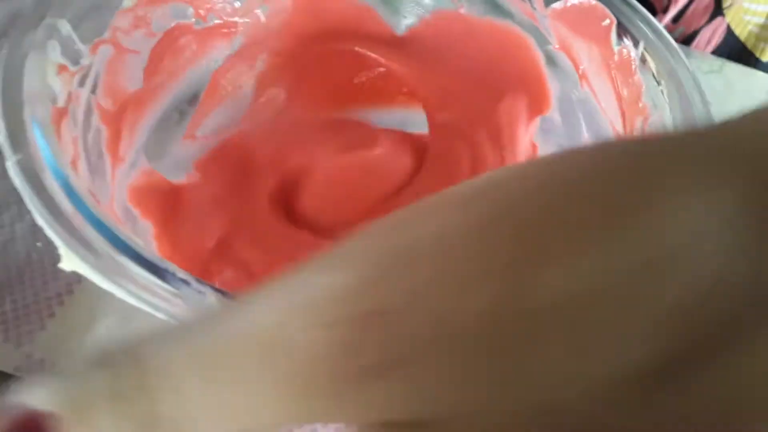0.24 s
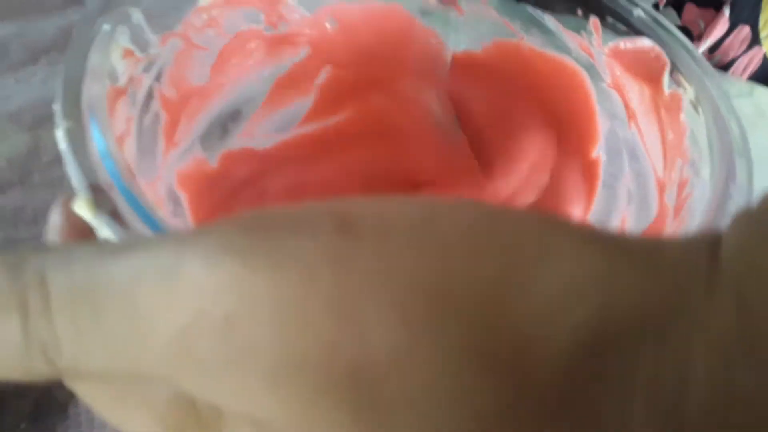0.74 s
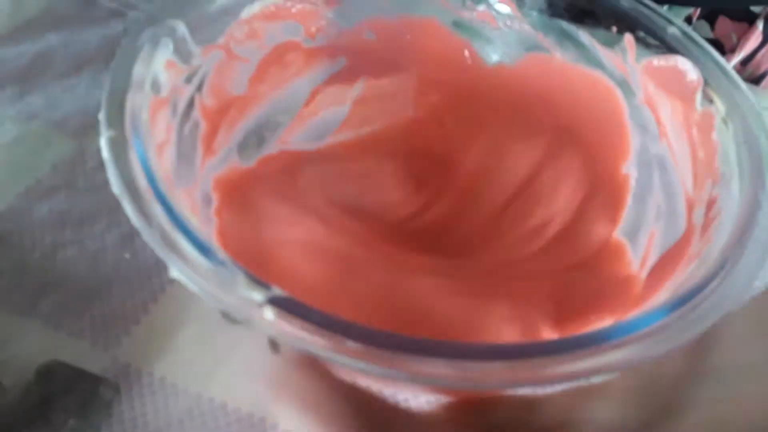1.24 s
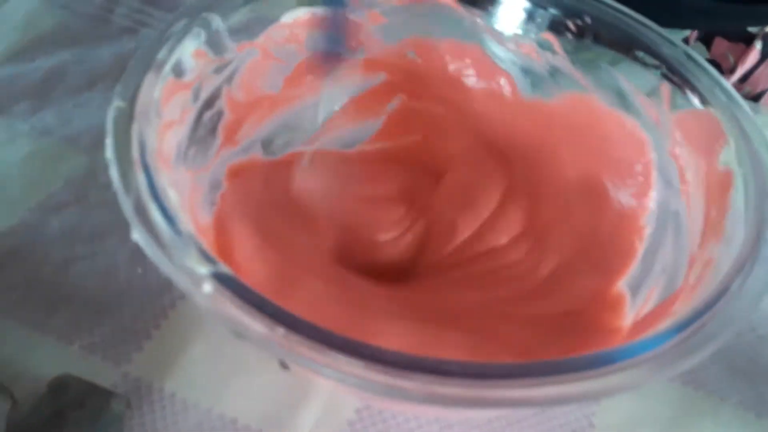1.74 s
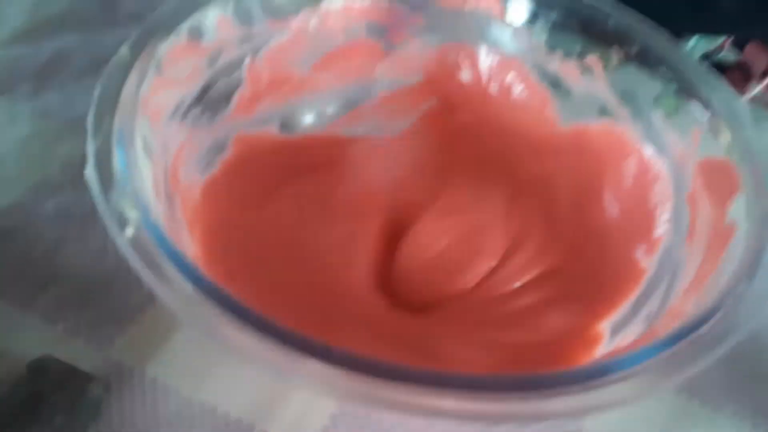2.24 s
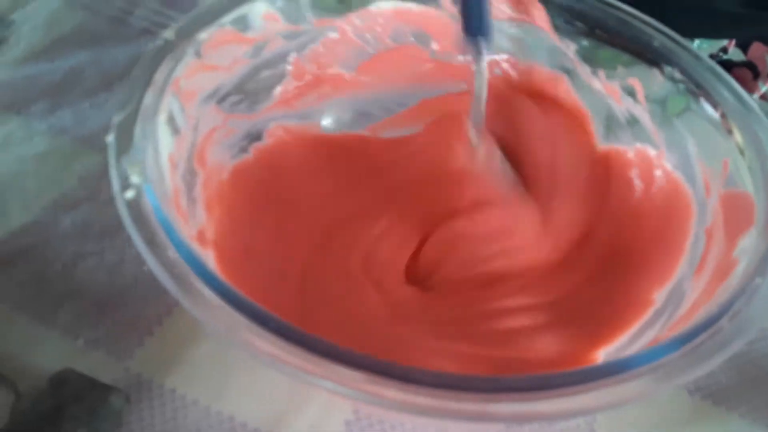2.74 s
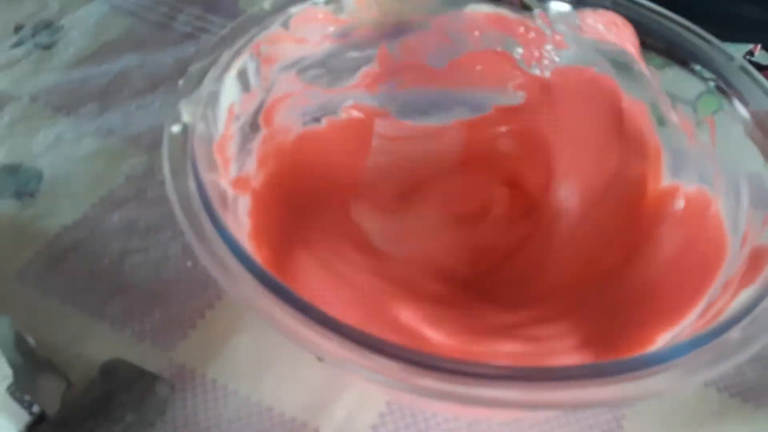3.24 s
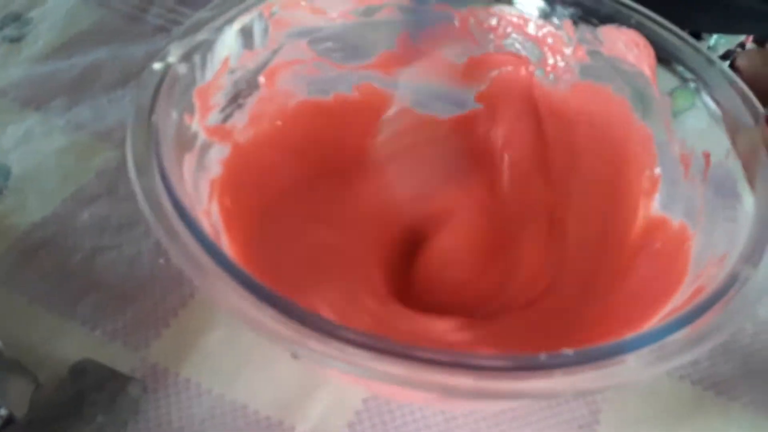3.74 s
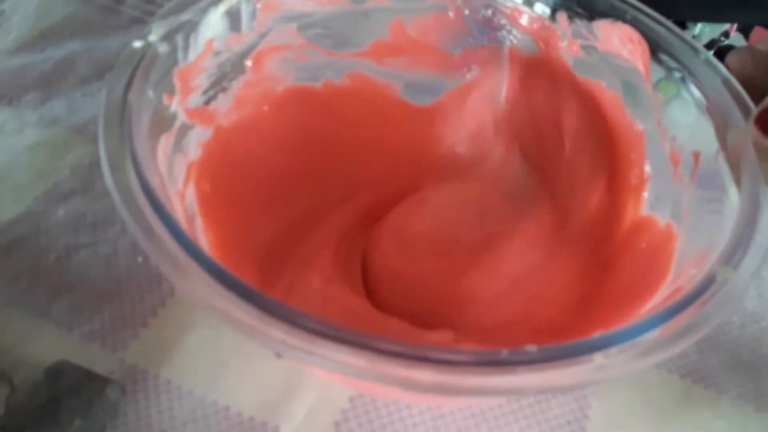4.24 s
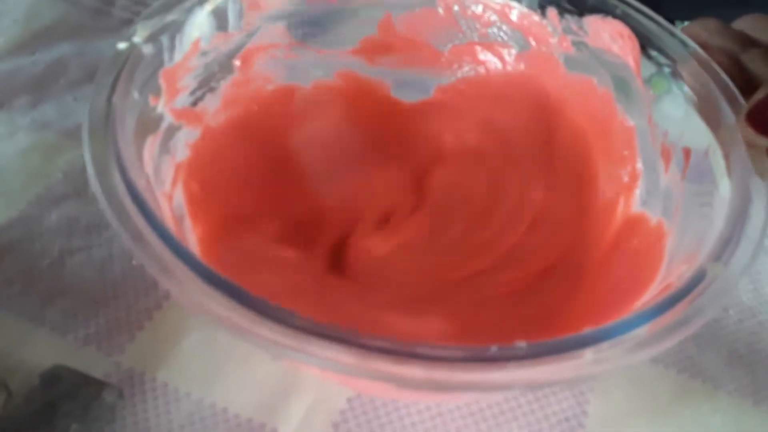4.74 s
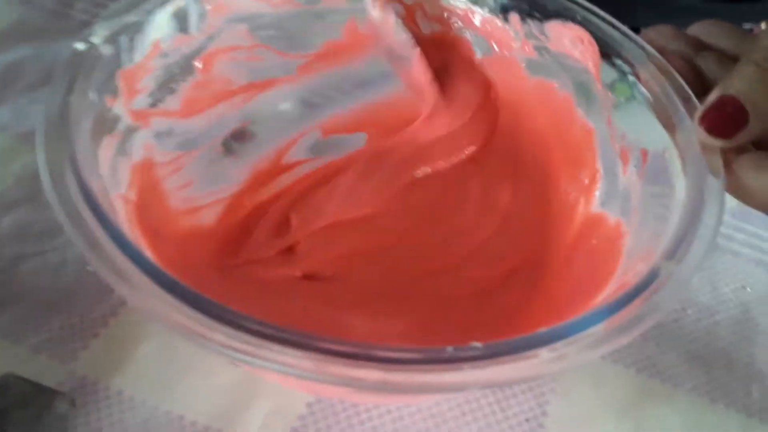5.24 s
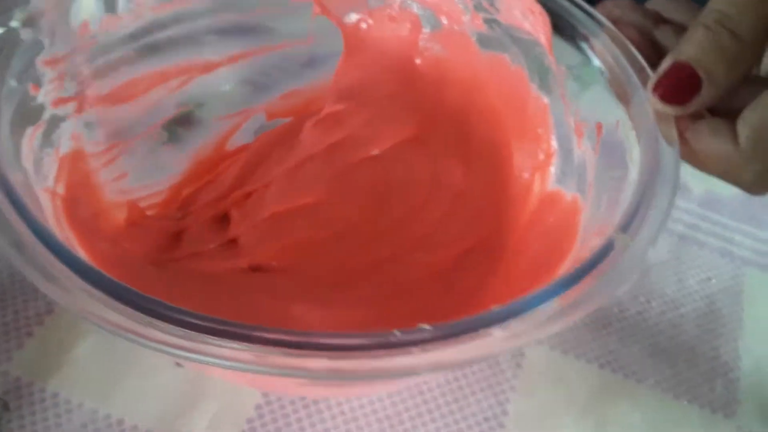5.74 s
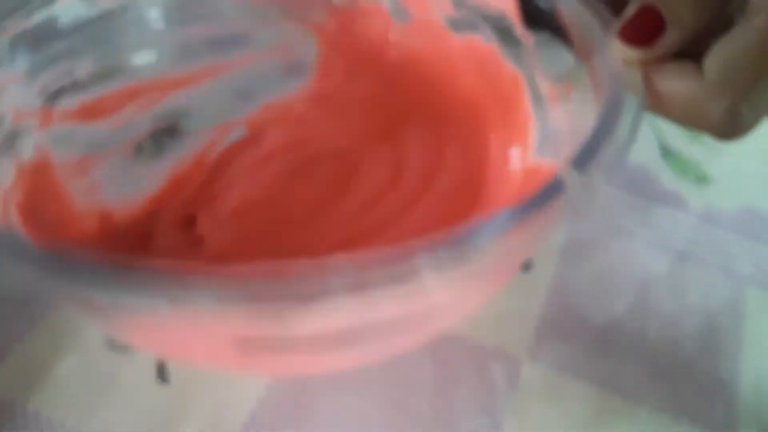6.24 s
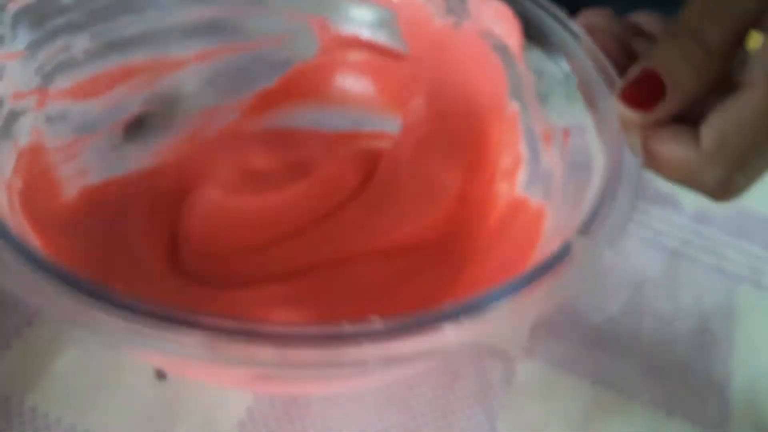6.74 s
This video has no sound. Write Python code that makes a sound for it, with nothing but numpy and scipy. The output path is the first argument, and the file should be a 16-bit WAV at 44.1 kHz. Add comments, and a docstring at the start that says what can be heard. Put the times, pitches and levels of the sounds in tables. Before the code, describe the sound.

Close up in a small quiet kitchen, a metal whisk beats thick creamy batter in a glass bowl. Irregular bright ticks and dull knocks accompany soft wet squelches about four or five times a second, growing stronger midway. The beating eases, then six sharp, evenly spaced raps ring the glass and thump the table. A short lull follows, then a few light clicks and strokes. Faint room air and hum lie beneath.

```python
"""Close by, a wire whisk clicks and squelches as it beats thick cream in a glass bowl in a small kitchen.
The wires hit the cream-damped wall about twice a turn: each hit mixes short noise, a knock and wire rings.
Random snaps and small tones make the wet squelch; sinking notes make air pockets, low knocks and a thump.
A few hard blows ring the bare glass and thump the table; shaped noise moves the bowl on its cloth.
Steady noise follows how hard the cream is worked, over quiet air and a faint mains hum."""
import sys
import numpy as np
from scipy import signal
from scipy.fft import rfft, irfft, next_fast_len
from scipy.io import wavfile
from scipy.ndimage import uniform_filter1d, map_coordinates

SR = 44100
rng = np.random.default_rng(int(sys.argv[2]) if len(sys.argv) > 2 else 0)


def output_pcm(signal):
    """Save a mono or channel-first signal as 16-bit PCM at the path in sys.argv[1].

    Samples are clipped to [-1, 1] before scaling.
    """
    pcm = np.clip(np.atleast_2d(signal).T, -1, 1) * 32767
    wavfile.write(sys.argv[1], SR, np.round(pcm).astype(np.int16))


N = 309123
HIT = 8192  # samples in one short sound
T = np.arange(HIT) / SR  # seconds within a short sound
NOW = np.arange(N) / SR  # seconds within the whole scene

# Faint mains hum in the room. Each row: pitch in Hz, level in dB.
HUM = [(100, -77), (200, -94.5), (300, -80.5)]
# How hard the cream is being worked. Each row: time in seconds, effort in dB.
EFFORT = [(0.0, -66), (0.29, -69), (0.49, -60), (1.6, -57), (2.09, -58), (3.1, -61), (3.43, -53),
          (4.24, -53), (4.61, -55), (5.0, -66), (5.7, -61), (6.01, -74), (6.66, -76), (7.01, -57)]
# Wires pressed along the glass. Each row: middle in seconds, half length in seconds, level in dB.
DRAGS = [(1.065, 0.074, -41.5), (3.37, 0.13, -61), (6.77, 0.028, -50)]
# The bowl shifting on the cloth. Each row: middle in seconds, half length in seconds, level in dB.
SHIFTS = [(6.693, 0.0063, -50), (6.81, 0.041, -53)]
# Blows on the glass above the cream. Each row: start in seconds, strength in dB, cream on the spot
# from 0 to 1, low modes over middle ones in dB, sparkle over the crack in dB, skid's 60 dB fade in seconds.
BLOWS = [(.0094, -27, 1, 1, -12.5, 0.01), (5.144, -24, 1, -5.5, -9.5, 0.013),
         (5.3584, -16, 0.21, -7.5, -8.5, 0.0097), (5.5568, -17.5, 0.01, -6.5, -14, 0.014),
         (5.7467, -17.5, 0.07, -10, -13, 0.01), (5.9464, -18.5, 0.28, -13.5, -11.5, 0.016),
         (6.1768, -17.5, 0.16, 4.5, -12.5, 0.032)]
# Wires meeting the wall, about twice a turn. Each row: start in seconds, then the levels of
# tick, knock and sparkle in dB, before the trims in clicks().
CLICKS = [(0.0728, -43.5, -49, -65), (.2565, -41.5, -50, -57), (.3242, -27.5, -43.5, -42),
          (.458, -30.5, -35.5, -39), (0.6486, -37.5, -43.5, -52.5), (0.7657, -21, -39.5, -42),
          (0.836, -34.5, -39.5, -44.5), (.987, -21, -35, -39), (1.0503, -32, -38.5, -44),
          (1.2822, -35, -38.5, -41), (1.4219, -37.5, -54.5, -61), (1.5022, -31, -39, -37.5),
          (1.7013, -29, -38, -41), (1.7434, -40, -41.5, -44), (1.8408, -13, -35, -33),
          (1.97, -36.5, -37, -44.5), (2.045, -33.5, -44.5, -45), (2.1756, -28.5, -33, -38.5),
          (2.2708, -30, -48, -64), (2.4096, -31, -36, -44), (2.4922, -32, -45.5, -53),
          (2.6349, -31.5, -36, -45.5), (2.7236, -38.5, -49, -56), (2.7874, -46, -61, -54),
          (2.8559, -29, -32.5, -40), (3.076, -29, -31.5, -38), (3.2961, -20.5, -28, -35),
          (3.3983, -28, -40, -37), (3.4057, -37, -52, -46), (3.5084, -21.5, -29, -34),
          (3.584, -20.5, -35.5, -42), (3.7062, -27, -32, -38.5), (3.7885, -36, -43.5, -47),
          (3.9046, -25.5, -31, -38.5), (4.0078, -22, -35, -44.5), (4.1042, -24.5, -47, -29),
          (4.115, -30, -34, -40.5), (4.208, -22.5, -39, -48), (4.314, -24.5, -37.5, -27),
          (4.3317, -25, -28.5, -41.5), (4.3737, -41, -50.5, -52), (4.501, -28, -49, -40.5),
          (4.519, -20, -27.5, -32), (4.6138, -25.5, -33, -41.5), (4.7113, -39.5, -81, -57),
          (4.7293, -19, -23, -28.5), (4.908, -37, -71, -62), (4.9191, -32.5, -83, -51),
          (4.923, -34, -51, -47), (5.0151, -35, -57.5, -64), (5.234, -47, -65, -62), (6.46, -31, -48, -43),
          (6.6134, -52, -65.5, -73), (6.719, -34, -44.5, -51.5), (6.8216, -33, -41.5, -60),
          (6.9187, -48.5, -55, -68), (6.9427, -27.5, -37, -42)]
# The knock's middle pitch drifts as the whisk works into deeper cream and out again.
# Each row: time in seconds, pitch in Hz.
KNOCK_HZ = [(1, 983), (2, 895), (3.9, 872), (4.7, 996), (7, 1016)]
# Single soft notes in the bowl: air pockets in the cream, small low knocks and a thump.
# Each row: start in seconds, level in dB, pitch it sinks to in Hz.
SOFT_NOTES = [(0.32, -23.5, 450), (1.203, -31, 2106), (1.421, -22.5, 2164), (1.646, -27, 1990),
              (2.12, -35, 382), (2.362, -33.5, 330), (2.593, -44, 610), (3.182, -22, 2405),
              (3.72, -23.5, 2950), (3.835, -26.5, 2140), (4.014, -18, 2240), (4.052, -34, 730),
              (4.085, -33, 1000), (4.173, -39, 168), (4.287, -26.5, 1066), (4.302, -35.5, 1570),
              (4.482, -39.5, 1400), (5.458, -22.5, 2230), (5.458, -17, 4520), (5.824, -26, 4890),
              (6.782, -28.5, 258), (6.825, -33.5, 404)]
# Sweeps through the cream, about one a turn. Each row: middle in seconds, half length in seconds,
# then the levels of wet fizz and air pocket in dB, before the trims in squelches().
SWEEPS = [(.557, .011, -46.5, -52), (1.198, .012, -41.5, -42.5), (1.406, .018, -38, -47.5),
          (1.633, .017, -36, -41.5), (2.083, .014, -38.5, -43), (2.298, .014, -34.5, -40.5),
          (2.52, .012, -38.5, -43.5), (2.751, .011, -35.5, -41.5), (2.965, .017, -42.5, -46.5),
          (3.182, .017, -37, -41), (3.399, .02, -35.5, -36.5), (3.614, .015, -35, -35.5),
          (3.812, .013, -32.5, -34.5), (4.028, .011, -42, -36.5), (4.24, .013, -41, -40.5),
          (4.42, .016, -39.5, -43.5), (4.572, .018, -41.5, -45.5), (4.767, .015, -41, -49),
          (4.99, .012, -45, -57), (5.232, .011, -41.5, -45), (5.446, .011, -36, -41.5),
          (5.631, .014, -40, -51.5), (5.826, .015, -44.5, -57), (6.047, .011, -47.5, -68),
          (6.299, .034, -45, -50), (6.584, .023, -50.5, -55.5)]

# Ways the bowl rings (its modes). Each row: pitch in Hz, relative level in dB,
# 60 dB fade in seconds before the length setting in glass().
BOWL_MODES = [(638, -11, .17), (1731, 0, .095), (3157, 0, .065), (4957, 0, .075), (7016, -6, .085),
              (8724, -21, .05), (12730, -17, .06)]
# Ways the wire loops ring, damped by cream. Each row: pitch in Hz, width in Hz, relative level in dB,
# before the small random changes in loops().
WIRE_MODES = [(1577, 200, 3), (1779, 140, 5), (2398, 250, 3.5), (3160, 380, 1.5), (3710, 260, -5.5)]

# Tone colours of the sounds. Each row: frequency in Hz, relative level in dB per Hz.
TICK = [(60, -27.5), (200, -15.5), (550, -23.5), (1500, -15.5), (3000, -17.5), (4400, -3.5), (5500, 2.5),
        (7000, -1), (8200, -12.5), (9800, -23.5), (12500, -22.5), (17000, -24)]
SPARKLE = [(5000, -52), (9500, -16), (12400, 1.5), (15500, -12), (17000, -9)]
FIZZ = [(1500, -32.5), (3300, -2.5), (4700, 5.5), (6700, 7), (8200, -6), (10000, -14.5), (13000, -6),
        (16000, -19)]
THUMP = [(25, -21.5), (70, 7.5), (140, 10.5), (280, 3.5), (550, -2), (1000, -3.5), (2500, -45.5)]
CREAM = [(150, 3), (400, 7.5), (650, -2), (920, 8), (1300, -28), (2500, -12.5), (4000, 1.5), (6000, -22),
         (9000, -49), (15000, -33.5)]
AIR = [(25, -5.5), (90, 0.5), (200, 7), (400, -7.5), (900, -16.5), (2500, -6.5), (6000, -9.5), (9000, -24),
       (16000, -35.5)]
SHIFT_TONE = [(40, -9.5), (120, 23.0), (300, 15.5), (500, -23), (1500, -7.5)]
# Tone of the kitchen's answer. Each row: frequency in Hz, relative level in dB.
KITCHEN_TONE = [(100, -23), (800, 2), (1800, 2), (3500, 2.5), (6000, -3), (13000, 4.5)]

# the loops ring with the force of a contact, the high ones rising faster:
# dB at the usual force, then dB per dB of force
LOW_LOOPS_DB, LOW_LOOPS_PER_FORCE = -38.5, 0.76
HIGH_LOOPS_DB, HIGH_LOOPS_PER_FORCE = -39.5, 1.02
USUAL_FORCE_DB, USUAL_EFFORT_DB = -33, -60
HIGH_LOOPS_PER_EFFORT = 0.37  # dB per dB: fast beating flings the loops clean, so they ring brighter
TICK_HZ = 5530
TICK_SCATTER, KNOCK_SCATTER = 0.13, 0.032  # relative spread of pitch from contact to contact
# contacts high on the wall (much tick, little knock) spill more into the room than those deep in the cream
SPILL_PER_DB = 0.2536  # dB of room per dB of tick over knock
# a full coat of cream changes the high modes and the thump by these dB, and cuts this share of ring time
COAT_HIGH_DB, COAT_THUMP_DB, COAT_SHORTENS = -32, -18, 0.32
GRAZES_PER_S, GRAZE_DB = 2.5, 5  # light brushes at random, usual dB over the effort
SOFT_NOTE_T60_S = 0.038  # time to fade by 60 dB
POCKET_HZ, POCKET_SCATTER = 2372, 0.059  # air pocket behind the wires, a little different each sweep
TOP_HZ = 16700  # nothing is kept above this


def amp(db):
    """Turn decibels into gain."""
    return 10 ** (np.asarray(db) / 20)


def unit(x):
    """Scale to an average strength (rms) of 1."""
    return x / np.sqrt(np.mean(x ** 2) + 1e-20)


def burst(x):
    """Scale a short sound to the energy of 20 ms at rms 1."""
    return x / (np.linalg.norm(x) + 1e-12) * np.sqrt(.02 * SR)


def along(points, hz):
    """Read between (Hz, value) points on a log axis, as pitch is heard."""
    f, v = np.transpose(points)
    return np.interp(np.log(hz + 1), np.log(f + 1), v)


def wobble(rate):
    """A smooth random curve with rate new values a second."""
    return map_coordinates(rng.standard_normal(int(N * rate / SR) + 4), [NOW * rate])


def add(track, s, x):
    """Mix x into the track from time s in seconds."""
    start = max(round(s * SR), 0)
    part = track[start:start + len(x)]
    part += x[:len(part)]


def filtered(x, response):
    """Shape x by a gain that depends on frequency."""
    m = next_fast_len(len(x) + 400)
    return irfft(rfft(x, m) * response(np.fft.rfftfreq(m, 1 / SR)), m)[:len(x)]


def resonance(f, hz, width_hz):
    """One resonance: strongest at hz, and ringing longer when narrow."""
    return 1j * f * width_hz / (hz * hz - f * f + 1j * f * width_hz)


def impulse(spectrum):
    """The most compact pulse with this tone colour that never sounds before its start."""
    log_gain = np.log(amp(along(spectrum, np.fft.rfftfreq(HIT, 1 / SR))))
    cepstrum = irfft(log_gain)
    # fold the backward half onto the forward half
    fold = (1 + np.sign(HIT / 2 - np.arange(HIT))) * np.where(T > 0, 1, .5)
    return irfft(np.exp(rfft(cepstrum * fold)))


def hiss(spectrum):
    """Steady noise of rms 1 in the given tone colour."""
    return unit(filtered(rng.standard_normal(N), lambda f: amp(along(spectrum, f))))


def swells(rows):
    """Gain over time: each (middle s, half length s, dB) row swells and fades like a bell curve."""
    return sum(amp(db) * np.exp(-.5 * ((NOW - s) / half) ** 2) for s, half, db in rows)


def effort_db(s):
    """How hard the cream is being worked at time s."""
    return np.interp(s, *np.transpose(EFFORT))


def in_kitchen(x, room_db, delay=0.0081, t60=0.31, treble_t60=0.29, treble_hz=9000):
    """A sound and the hard walls' answer, which comes a little later and loses its treble first."""
    t, f = NOW[:2 * HIT], np.fft.rfftfreq(3 * HIT, 1 / SR)
    fades = amp(-60 * t / np.array([[t60], [treble_t60]]))
    slow, fast = rfft(rng.standard_normal(len(t)) * fades, 3 * HIT)
    tail = np.where(f < treble_hz, slow, fast) * amp(along(KITCHEN_TONE, f))
    out = np.pad(x, (0, 2 * HIT))
    answer = irfft(rfft(out) * tail) / np.sqrt(np.mean(np.abs(tail) ** 2))
    add(out, delay, amp(room_db) * answer)
    return out


def room_air():
    """The room's quiet air: steady shaped noise."""
    return amp(-66.5) * hiss(AIR)


def mains_hum():
    """The faint mains hum: a few steady pure tones."""
    return sum(amp(db) * np.sqrt(2) * np.sin(2 * np.pi * hz * NOW) for hz, db in HUM)


def stirring(churn_db=-3, scrape_db=-3, singing_db=-12):
    """With effort the cream rolls over, wires rub and the bowl hums; now and then the bowl shifts."""
    effort = amp(effort_db(NOW))
    churn = effort * amp(churn_db + 2.55 * wobble(17)) * hiss(CREAM)
    rubbing = unit(amp(3 * wobble(220)) * (hiss(TICK) + amp(-13) * hiss(SPARKLE)))
    scrape = (effort * amp(scrape_db) + swells(DRAGS)) * rubbing
    # noise through the bowl's lowest mode
    hum = filtered(rng.standard_normal(N), lambda f: resonance(f, BOWL_MODES[0][0], 15) ** 2)
    singing = effort * amp(singing_db) * unit(hum)
    shifting = swells(SHIFTS) * hiss(SHIFT_TONE)
    return churn + scrape + singing + shifting


def chatter(t60, after_db, after_t60):
    """Contact force: a wire skids for an instant, then buzzes faintly."""
    fade = amp(-60 * T / t60) + amp(after_db - 60 * T / after_t60)
    return rng.standard_normal(HIT) * fade * (1 - np.exp(-T / 0.0001))


def struck(colour, t60):
    """A very short skid of steel on glass, in the given colour."""
    skid = chatter(t60, after_db=-18.0, after_t60=0.028)
    return burst(signal.fftconvolve(skid, colour)[:HIT])


def glass(group_db, length):
    """The bowl rings in fading tones; the spot struck sets their length and low, middle and high levels."""
    group = np.digitize([row[0] for row in BOWL_MODES], [2400, 4000])
    ring = np.zeros(HIT)
    for g, (hz, db, t60) in zip(group, BOWL_MODES):
        tone = np.sin(2 * np.pi * hz * T) * amp(-60 * T / (t60 * length))
        ring = ring + amp(group_db[g] + db) * burst(tone)
    return ring


def blows(thump_db=-13, ring_db=-14, high_ring_db=-2, ring_share=0.8, crack_room_db=-11.5,
          ring_room_db=-13):
    """Hard blows ring the glass and thump the table, less so where cream coats the spot."""
    out, colour, top, table = np.zeros(N), impulse(TICK), impulse(SPARKLE), impulse(THUMP)
    for s, db, coat, low_db, top_db, skid in BLOWS:
        coat = np.clip(coat, 0, 1)
        group_db = [ring_db + low_db / 2, ring_db - low_db / 2, high_ring_db + COAT_HIGH_DB * coat]
        crack = struck(colour, t60=skid) + amp(top_db) * struck(top, t60=0.0059)
        ring = glass(group_db, ring_share * (1 - COAT_SHORTENS * coat))
        thump = amp(thump_db + COAT_THUMP_DB * coat) * burst(table)
        blow = in_kitchen(crack, crack_room_db) + in_kitchen(ring + thump, ring_room_db)
        add(out, s, amp(db) * blow)
    return out


def bounce(share=0.91, gap=0.000524, skid=0.031):
    """Contact force of a wire: one push, a rebound of random size and direction, and a little skid."""
    force = skid * rng.standard_normal(HIT) * amp(-60 * T / 0.044)
    force[0] += 1
    rebound_at = int(abs(gap) * SR * rng.uniform(.5, 2)) + 1
    force[rebound_at] += share * rng.standard_normal()
    return force


def loops(push, high):
    """The lower or higher wire modes; a different loop touches each time, so the ring changes a little."""
    chance = rng.standard_normal((len(WIRE_MODES), 2)) * [2.5, .018]  # dB, share of pitch
    rows = []
    for (hz, width, db), (extra_db, bend) in zip(WIRE_MODES, chance):
        if (hz > 2770) == high:
            rows.append((hz * (1 + bend), width, db + extra_db))

    def response(f):
        """Add up the chosen modes."""
        return sum(amp(db) * resonance(f, hz, width) * resonance(f, hz, 900) for hz, width, db in rows)

    return burst(filtered(push, response))


def clicks(tick_db=0, sparkle_db=0, knock_db=1, wire_db=2, knock_width_hz=190, tick_width_hz=900,
           focus=0.5, bowl_db=-19, room_db=-16):
    """Each contact gives a bright tick, a dull knock of the filled bowl and a brief ring of the loops."""
    out, colour, top = np.zeros(N), impulse(TICK), impulse(SPARKLE)
    for s, bright_db, body_db, top_db in CLICKS:
        force_db = (bright_db + body_db) / 2 - USUAL_FORCE_DB
        low_db = LOW_LOOPS_DB + LOW_LOOPS_PER_FORCE * force_db
        high_db = HIGH_LOOPS_DB + HIGH_LOOPS_PER_FORCE * force_db
        high_db += HIGH_LOOPS_PER_EFFORT * (effort_db(s) - USUAL_EFFORT_DB)

        tick_hz = TICK_HZ * np.exp(TICK_SCATTER * rng.standard_normal())
        body_hz = np.interp(s, *np.transpose(KNOCK_HZ)) * np.exp(KNOCK_SCATTER * rng.standard_normal())
        tick = burst(filtered(struck(colour, t60=0.0075),
                              lambda f: 1 + focus * resonance(f, tick_hz, tick_width_hz)))
        sparkle = struck(top, t60=0.0058)
        push = bounce()
        knock = burst(filtered(push, lambda f: resonance(f, body_hz, knock_width_hz)
                               * resonance(f, body_hz * 1.163, 480)))
        wires = amp(low_db) * loops(push, high=False) + amp(high_db) * loops(push, high=True)

        click = amp(bright_db + tick_db) * tick + amp(top_db + sparkle_db) * sparkle
        click = click + amp(body_db + knock_db) * knock + amp(wire_db) * wires
        # through the cream the glass itself rings only faintly
        click = click + amp(high_db + bowl_db) * glass([-3, -3, -3], 1)
        spill_db = SPILL_PER_DB * min(bright_db - body_db, 20)
        add(out, s, in_kitchen(click, room_db + spill_db))
    return out


def grazes(spread_db=3, room_db=-13):
    """Other loops brush the wall at random, harder when the whisk is worked harder."""
    out, colour = np.zeros(N), impulse(TICK)
    for s in rng.uniform(0, N / SR, int(GRAZES_PER_S * N / SR)):
        db = effort_db(s) + GRAZE_DB + spread_db * rng.standard_normal()
        add(out, s, in_kitchen(amp(db) * struck(colour, t60=0.0055), room_db))
    return out


def soft_notes(sag=0.09, flutter=.35):
    """Air pockets and small low knocks each give a soft, sinking, unsteady note."""
    out = np.zeros(N)
    for s, db, hz in SOFT_NOTES:
        sinking_hz = hz * (1 + sag * np.exp(-T / 0.0035))
        phase = 2 * np.pi * np.cumsum(sinking_hz) / SR
        slow_noise = unit(uniform_filter1d(rng.standard_normal(HIT), size=90))
        unsteady = flutter * np.sqrt(hz / 1000) * slow_noise
        envelope = amp(db - 60 * T / SOFT_NOTE_T60_S) * (1 - np.exp(-T / 0.0022))
        add(out, s, in_kitchen(envelope * np.sin(phase + unsteady), -14))
    return out


def crackle(rate, spread_db):
    """Tiny films of cream snapping, rate a second, in uneven sizes."""
    snaps = rng.random(HIT) < rate / SR
    return snaps * rng.choice([-1, 1], HIT) * amp(spread_db * rng.standard_normal(HIT))


def bubbles(half, hz, spread, cycles, count):
    """A few small bubbles pop during a sweep; later ones tend to be lower as the furrow opens."""
    when, pitch, size = rng.standard_normal((count, 3)).T[:, :, None]
    when = np.clip(when, -1.8, 1.8)
    age = np.maximum(T - T[-1] / 2 - half * when, 0)
    turns = age * hz * np.exp(spread * pitch - .05 * when)
    # each fades by 60 dB over the given number of cycles
    envelope = amp(12.0 * size - 60 * turns / cycles) * (1 - np.exp(-turns))
    return unit(np.sum(envelope * np.sin(2 * np.pi * turns), axis=0))


def squelches(pocket_db=-1, fizz_db=-1, bubble_db=-6, spit_db=-6, pocket_width_hz=300, lower=0.7,
              room_db=-15):
    """The loops tear furrows: films snap, bubbles pop, and the air pockets behind the wires resonate."""
    out, middle = np.zeros(N), T[-1] / 2
    for s, half, wet_db, body_db in SWEEPS:
        hz = POCKET_HZ * np.exp(POCKET_SCATTER * rng.standard_normal())
        swell = np.exp(-.5 * ((T - middle) / half) ** 2)
        size = np.sqrt(np.mean(swell ** 2))
        snaps = swell * crackle(rate=1400, spread_db=4.5)

        def pockets(f):
            """Three air resonances under one broad one."""
            main = resonance(f, hz, pocket_width_hz)
            low = 0.53 * resonance(f, hz * lower, pocket_width_hz)
            high = .5 * resonance(f, 4500, 300)
            return (main + low + high) * resonance(f, 1660, 1500)

        body = amp(pocket_db) * unit(filtered(snaps, pockets))
        body = body + amp(bubble_db) * bubbles(half, hz, 0.2, 55, count=7)
        fizz = amp(fizz_db) * unit(filtered(snaps, lambda f: amp(along(FIZZ, f))))
        fizz = fizz + amp(spit_db) * bubbles(half, 5700, 0.2, 80, count=9)
        squelch = size * (amp(body_db) * body + amp(wet_db) * fizz)
        add(out, s - middle, in_kitchen(squelch, room_db))
    return out


def scene():
    """Whisk, bowl and cream over the quiet air and faint hum of the room."""
    room = room_air() + mains_hum()
    whisking = stirring() + blows() + clicks() + grazes() + soft_notes() + squelches()
    return (room + whisking)[None]


def record(dry):
    """Round off the loudest peaks at full scale and fade out the treble just below the top limit."""
    soft = dry / (1 + np.abs(dry) ** 6) ** (1 / 6)
    return filtered(soft[0], lambda f: np.clip((TOP_HZ - f) / 900, 0, 1) ** 2)[None]


dry = scene()
out = record(dry)
output_pcm(out)
```